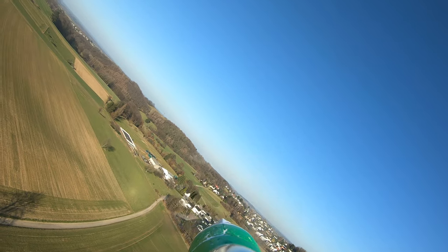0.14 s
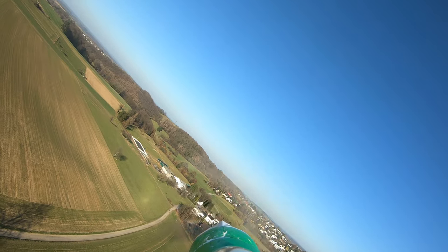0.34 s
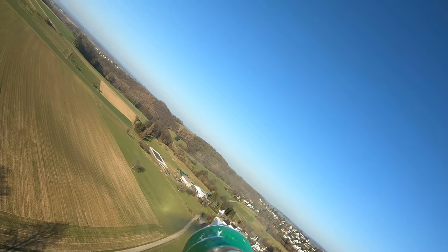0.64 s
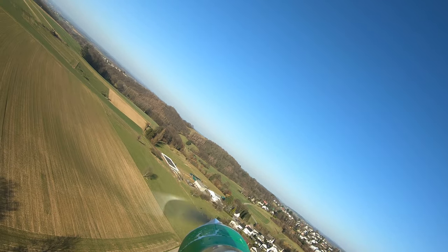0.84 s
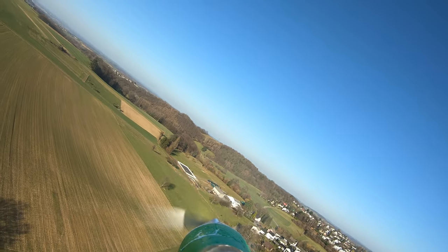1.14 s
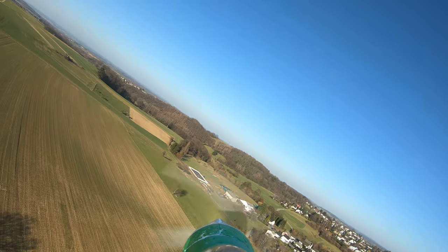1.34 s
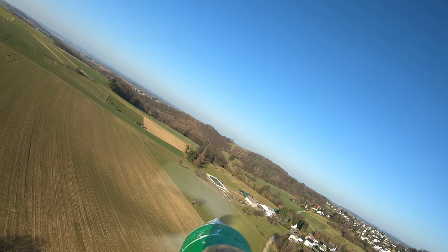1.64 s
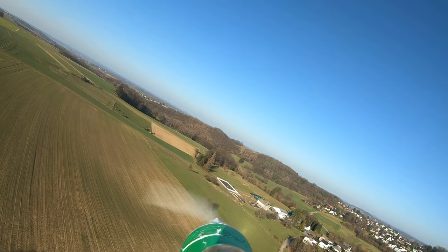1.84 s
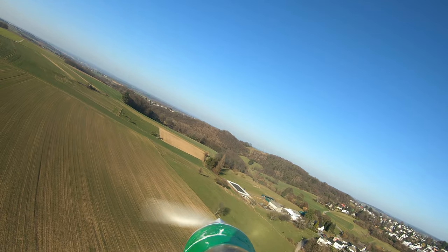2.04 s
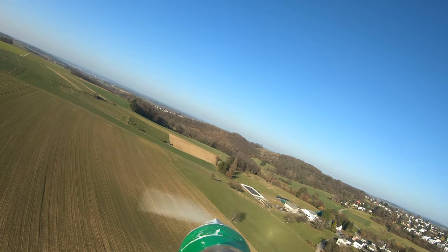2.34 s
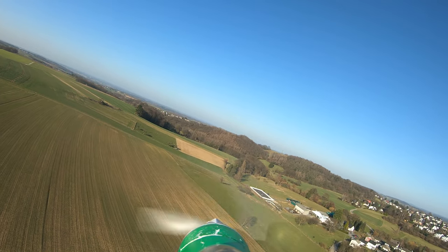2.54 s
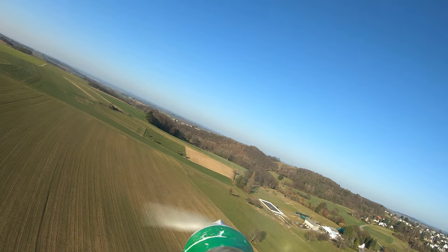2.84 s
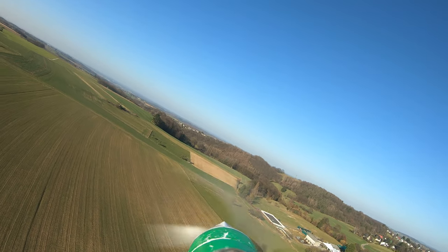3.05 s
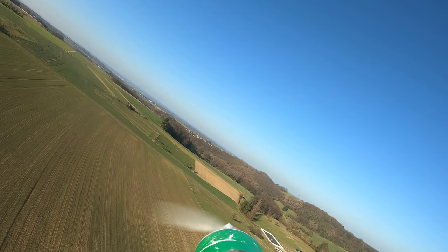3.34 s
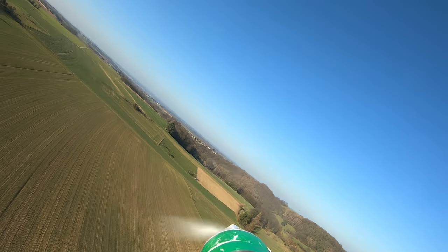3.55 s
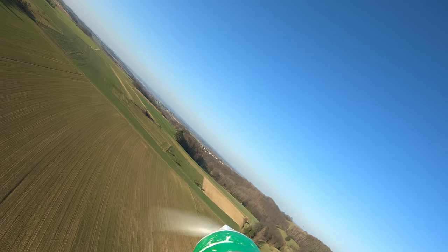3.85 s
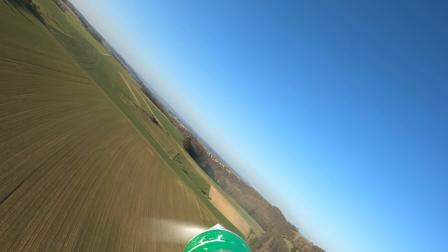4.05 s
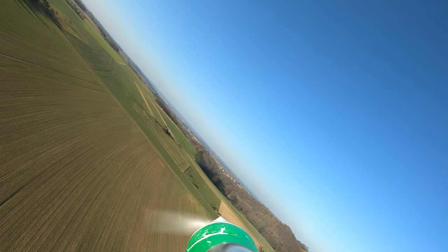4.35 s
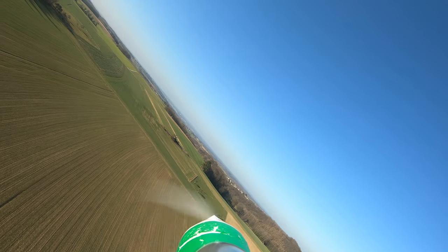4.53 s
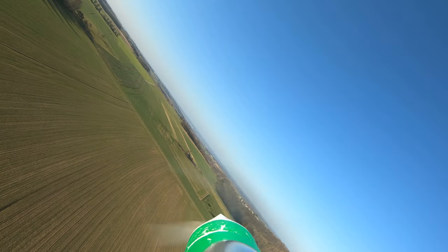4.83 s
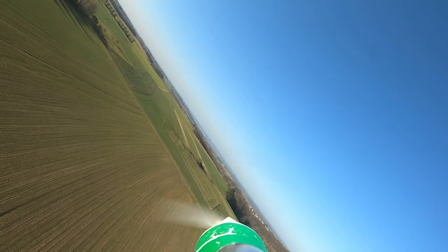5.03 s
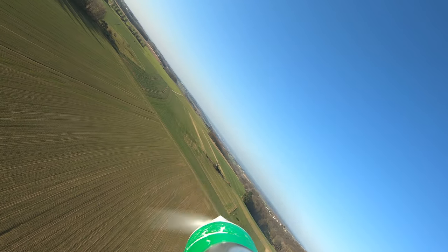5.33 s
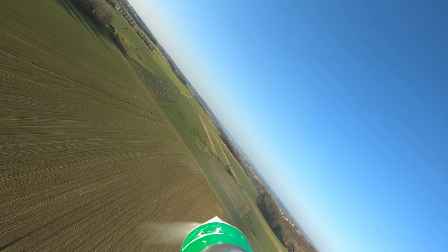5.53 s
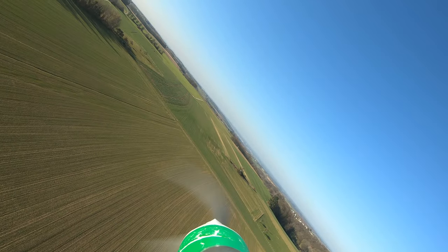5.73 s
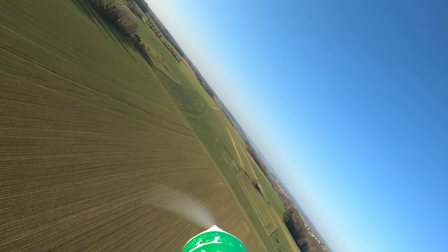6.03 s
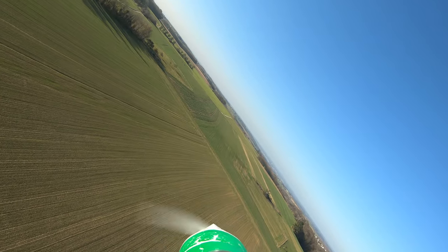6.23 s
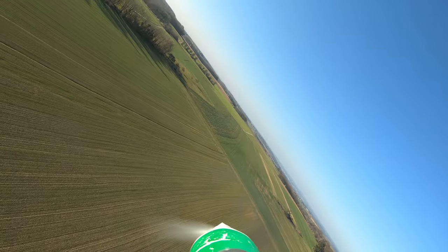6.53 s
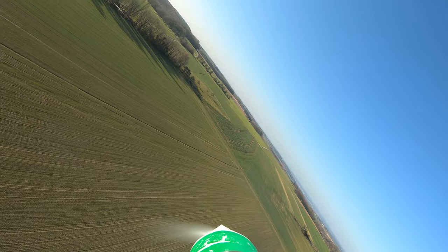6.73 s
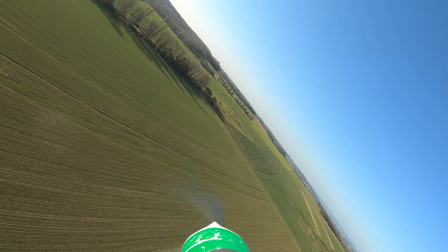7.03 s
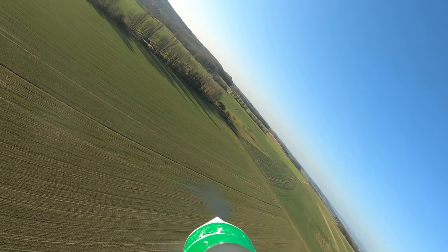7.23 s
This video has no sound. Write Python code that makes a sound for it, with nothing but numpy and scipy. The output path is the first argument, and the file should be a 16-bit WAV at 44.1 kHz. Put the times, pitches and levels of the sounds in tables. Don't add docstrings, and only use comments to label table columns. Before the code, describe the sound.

Aboard a small electric model airplane in open sky, a two-blade propeller hums low and buzzy just ahead of the microphone. Slipstream rumbles, flutters and hisses over it in uneven gusts. The drone holds nearly steady for about five seconds, then slides down by a few semitones as the throttle is reduced. Afterward it is rougher, with high motor whine and dry bearing rattle showing through.

```python
import sys
import numpy as np
from scipy import signal
from scipy.fft import rfft, irfft, next_fast_len
from scipy.io import wavfile
from scipy.ndimage import uniform_filter1d, minimum_filter1d

SR = 44100
rng = np.random.default_rng(int(sys.argv[2]) if len(sys.argv) > 2 else 0)


def output_pcm(signal):
    pcm = np.clip(np.atleast_2d(signal).T, -1, 1) * 32767
    wavfile.write(sys.argv[1], SR, np.round(pcm).astype(np.int16))


def volts_from_decibels(level):
    exponent = np.asarray(level, float) / 20
    return 10 ** exponent


N = 325458
TIME = np.arange(N) / SR
BALL_PASSES = 4.147
PORTS_OPPOSED = np.array([[1], [-1]])


def curves(table):
    start_s, *columns = np.transpose(table)
    return [np.interp(TIME, start_s, column) for column in columns]


def unit(x):
    return x / np.sqrt(np.mean(x ** 2))


def walk(rate_hz):
    hold = int(SR / rate_hz)
    steps = np.repeat(rng.standard_normal(N // hold + 1), hold)
    return unit(uniform_filter1d(uniform_filter1d(steps, hold), hold)[:N])


def at_hz(points, hz):
    point_hz, value = np.transpose(points)
    return np.interp(np.log(hz), np.log(point_hz), value)


def spectrum_hz(size):
    return np.maximum(np.arange(size // 2 + 1) * SR / size, 1)


def eddies(colour, flicker_db, rate_hz):
    size = next_fast_len(N)
    hz = spectrum_hz(size)
    low_hz, high_hz = colour[0][0], colour[-1][0]
    inside = (hz > low_hz) & (hz < high_hz)
    noise = rfft(rng.standard_normal(size)) * volts_from_decibels(at_hz(colour, hz)) * inside
    out = 0
    for octaves in np.arange(0, np.log2(high_hz / low_hz) + .5, .5):
        centre_hz = low_hz * 2 ** octaves
        band = np.cos(np.pi * np.clip(np.log2(hz / centre_hz), -.5, .5)) ** 2
        out = out + irfft(noise * band, size)[:N] * volts_from_decibels(flicker_db * walk(rate_hz))
    return unit(out)


def tone(phase, left_db, right_db, lead_rad):
    left = volts_from_decibels(left_db) * np.sin(phase)
    right = volts_from_decibels(right_db) * np.sin(phase + lead_rad)
    return np.sqrt(2) * np.array([left, right])


# start_s, length_s, level_db
WAKE_GUSTS = [(0.166, 0.1, 2.5), (0.353, 0.27, 1), (0.8, 0.088, 1.0), (1.016, 0.24, 1), (1.207, 0.82, 1),
              (1.663, .2, 1.5), (1.985, 0.3, 1), (2.41, 0.19, 3), (2.726, .2, -2.5), (3.303, 0.23, 1.5),
              (3.6, 0.26, 4.5), (3.89, 0.17, 5), (4.198, 0.16, 3.5), (4.35, .12, -3), (4.79, 0.069, -0.5),
              (4.97, 0.39, 4), (5.856, 0.3, 1), (6.588, 0.27, 2.5), (6.93, .5, -2.5), (7.1, .4, -7)]


def gusts():
    edge_s = .03

    def rise(start_s):
        return .5 + .5 * np.tanh(2 * (TIME - start_s) / edge_s)

    return sum(db * (rise(s) - rise(s + length)) for s, length, db in WAKE_GUSTS)


# pitch_hz, level_db per Hz
THUMP_COLOUR = [(15, -16), (28, -3.5), (45, -3.5), (70, 1), (110, -4), (160, -13), (300, -32)]


def thump(slip, eased, gust_db):
    level_db = -28.0 + 0.88 * slip + 3.9 * eased + 0.14 * gust_db
    shared = eddies(THUMP_COLOUR, .8, 6)
    opposed = .7 * PORTS_OPPOSED * eddies(THUMP_COLOUR, .8, 6)
    return (shared + opposed) * volts_from_decibels(level_db)


def shedding(colour, eased):
    slow = [(0.92 * hz, db) for hz, db in colour]
    return np.sqrt(1 - eased) * eddies(colour, .6, 14) + np.sqrt(eased) * eddies(slow, .6, 14)


# pitch_hz, level_db per Hz
LEFT_BUFFET = [(50, -20.5), (90, -6), (130, 0), (230, -1.5), (330, -4), (420, -10), (600, -30),
               (1000, -56.5)]
# pitch_hz, level_db per Hz
RIGHT_BUFFET = [(50, -30), (90, -4), (130, 0), (230, -2), (300, -4), (360, -8), (450, -17), (700, -38)]


def buffet(slip, eased, gust_db):
    left_db = -17.5 + 0.57 * slip + 0.67 * eased + 0.14 * gust_db
    right_db = -27.5 + 0.9 * slip + 6.9 * eased + 0.23 * gust_db
    left = shedding(LEFT_BUFFET, eased) * volts_from_decibels(left_db)
    right = shedding(RIGHT_BUFFET, eased) * volts_from_decibels(right_db)
    return np.array([left, right])


# pitch_hz, level_db per Hz
RUSH_COLOUR = [(250, -12), (380, -3), (500, 0), (750, -4), (1000, -10), (1500, -17), (2300, -28),
               (3300, -35), (4200, -42), (5200, -39), (5900, -49), (8000, -53), (10500, -68)]


def rush(eased, gust_db):
    level_db = -28.0 + 0.6 * eased + .2 * gust_db
    return PORTS_OPPOSED * eddies(RUSH_COLOUR, 1.2, 12) * volts_from_decibels(level_db + walk(30))


# pitch_hz, level_db per Hz
DULL_COLOUR = [(300, -8), (480, 2), (700, -6), (1100, -13), (1600, -16), (2500, -23.5), (3500, -28.5)]


def dull_roar(slip, eased, gust_db, flutter_db):
    level_db = -35.5 + 0.9 * slip - 0.2 * eased + 0.14 * gust_db
    return eddies(DULL_COLOUR, 0.48, 15) * volts_from_decibels(level_db + 0.84 * flutter_db)


# pitch_hz, level_db per Hz
HISS_COLOUR = [(1200, 0.5), (2000, -4), (2600, -4), (3600, -1.5), (4400, -8.5), (5300, -9.5), (7800, -15.5),
               (8400, -17), (9400, -16), (10500, -22), (12000, -31.5), (15200, -52)]


def hiss(slip, eased, gust_db, flutter_db):
    level_db = -50.5 + 0.33 * slip + 3.9 * eased + gust_db
    return eddies(HISS_COLOUR, 0.3, 14) * volts_from_decibels(level_db + 0.9 * flutter_db + 0.49 * walk(300))


# pitch_hz, left_minus_right_db
HOUSING_SHADE = [(500, -7), (2500, -7.5), (4500, 0), (5800, -8.5), (8000, -6), (8500, -3.5), (9500, -5),
                 (10500, -3.5), (12000, 0)]


def housing(x):
    size = next_fast_len(N)
    shade_db = at_hz(HOUSING_SHADE, spectrum_hz(size))
    split = np.array([[.5], [-.5]])
    return irfft(rfft(x, size) * volts_from_decibels(shade_db * split), size)[:, :N]


# centre_s, half_width_s, level_db
SLIPSTREAM_LULLS = [
    (5.97, 0.04, -8),
    (3.6, 0.018, -2),
    (3.5, 0.017, -5),
]


def wind(turn, eased, slip, gust_db):
    lull_db = sum(db * np.exp(-((TIME - s) / width) ** 2) for s, width, db in SLIPSTREAM_LULLS)
    lull = volts_from_decibels(lull_db)
    wake = volts_from_decibels(0.89 * np.cos(2 * turn) + 1.1 * np.cos(turn + 0.33))
    flutter_db = .6 * walk(12) + walk(45)
    out = thump(slip, eased, gust_db)
    out = out + buffet(slip, eased, gust_db) * lull
    out = out + rush(eased, gust_db) * wake ** 0.83 * lull ** 0.26
    out = out + dull_roar(slip, eased, gust_db, flutter_db) * wake ** 1.5
    return out + housing(hiss(slip, eased, gust_db, flutter_db) * wake)


# pitch_hz, width_hz, level_db
FRAME_RINGS = [(2550, 300, -8), (3000, 250, 0), (3500, 300, -1), (4050, 300, -6.5), (4700, 600, -6),
               (5350, 400, -7)]


def bearing_rattle(turn, level_db):
    passes = BALL_PASSES * turn / (2 * np.pi) + .024 * walk(250) + .04 * walk(12)
    ticks = np.abs(np.diff(np.floor(passes), prepend=0))
    ticks = ticks * (1 + .4 * np.cos(2 * turn))
    ticks = unit(ticks * volts_from_decibels(2.5 * rng.standard_normal(N)))
    strikes = ticks + .7 * rng.standard_normal(N)
    rattle = 0
    for hz, width_hz, db in FRAME_RINGS:
        b, a = signal.iirpeak(hz, hz / width_hz, SR)
        rattle = rattle + volts_from_decibels(db) * signal.lfilter(b, a, strikes)
    band = signal.butter(4, [2000, 5700], "bandpass", fs=SR, output="sos")
    rattle = unit(signal.sosfilt(band, rattle)) * volts_from_decibels(level_db + walk(12))
    return rattle * volts_from_decibels(np.array([[-2.0], [1.5]]))


SQUEAL = 5.0, 5.55, .06, -57.5, 5


def bearing_squeal(turn):
    start_s, end_s, edge_s, level_db, order = SQUEAL
    even = np.clip(np.minimum(TIME - start_s, end_s - TIME) / edge_s, 0, 1)
    phase = order * BALL_PASSES * turn + .9 * walk(30)
    return even * tone(phase, level_db - 2, level_db + 1.5, 0) * volts_from_decibels(2 * walk(15))


def chopping(turn, level_db):
    chopper = 2 * np.pi * 7954.5 * TIME
    steady = tone(chopper, level_db - 17.0, level_db, .1)
    beating = tone(chopper + 4 * turn, level_db - 23.0, level_db - 16.5, .1)
    return steady + beating


# multiple_of_shaft, left_db, right_db, right_lead_rad
WHINE_LINES = [(15, -9, -4, 1.5), (30, -3, 0, 1.8), (60, -22, -19, 2.5)]


def magnet_whine(turn, eased, whine_db, sing_db):
    out = 0
    for order, left_db, right_db, lead_rad in WHINE_LINES:
        loud_db = sing_db if order == 30 else -55.5 + .2 * (whine_db + 69.5)
        phase = order * turn + .5 * walk(25) + .25 * walk(90)
        line = tone(phase, loud_db + left_db, loud_db + right_db, lead_rad - 2.5 * eased)
        out = out + line * volts_from_decibels(1.3 * walk(30))
    return out


# start_s, level_db
FRAME_SINGING = [(5.1, -63), (5.25, -60), (5.58, -58), (5.63, -50), (5.95, -43.5), (6.332, -48.5),
                 (6.804, -40), (7.05, -50), (7.19, -57.5)]


def motor(turn, eased, slip, gust_db):
    whine_db = -68 + 4.5 * slip + 3.0 * eased
    sing_db = np.where(TIME > FRAME_SINGING[0][0], curves(FRAME_SINGING)[0] + 1.1, whine_db)
    chop_db = -74 + 3.2 * slip + 13 * eased + 0.21 * gust_db
    rattle_db = -53.5 + 1.01 * (chop_db + 65) + 0.1 * (sing_db + 49.5) * eased
    out = magnet_whine(turn, eased, whine_db, sing_db) + chopping(turn, chop_db)
    return out + bearing_rattle(turn, rattle_db) + bearing_squeal(turn)


def rough_line(order, turn, rough, left_db, right_db, lead_rad):
    phase = order * turn + rough * (.3 * walk(9) + .2 * walk(40))
    shake_db = rough * (1.2 * walk(10) + 1.2 * walk(40))
    left_only = rough * (.12 * walk(15) + .3 * walk(60)) + .3 / order ** 2 * walk(5)
    left_db = left_db - .7 + 1.3 * shake_db
    right_db = right_db - .3 + shake_db
    return tone(phase + left_only, left_db, right_db, lead_rad - left_only)


# multiple_of_shaft, left_db, right_db, right_lead_rad
BLADE_OVERTONES = [(3, -15, -13, 1.3), (4, -18, -18, 3.1), (5, -21.5, -24, 2.3), (6, -31, -29, 2.6),
                   (7, -31, -28, 2.6), (8, -35, -29.5, 2.4), (9, -36, -33, 2.8), (10, -34, -33, 2.3),
                   (12, -43, -38, 2.5), (13, -44, -39, 2.5)]


def blade_overtones(turn, edge_db):
    out = 0
    for order, left_db, right_db, lead_rad in BLADE_OVERTONES:
        phase = order * turn + .25 * walk(9) + .2 * walk(40)
        line = tone(phase, edge_db + left_db, edge_db + right_db, lead_rad)
        out = out + line * volts_from_decibels(2.2 * walk(5) + 1.2 * walk(14))
    return out


def propeller(turn, eased, slip, blade_db):
    rough = np.clip(.5 + (-13 - blade_db) / 8, .3, 1.7)
    brake_db = 12 * eased * (1 - eased)
    shaft_left_db = -15.0 - 3.4 * slip - 6.3 * eased + brake_db
    shaft_right_db = -23.5 + 7.3 * slip - 1.1 * eased + brake_db
    shaft_lead = 1.51 + 0.91 * slip - 0.73 * eased
    blade_right_db = blade_db - 7.5 + 5.6 * slip + 0.9 * eased
    blade_lead = -2.1 + 0.24 * slip - 1.7 * eased
    shaft = rough_line(1, turn, np.minimum(rough, .8), shaft_left_db, shaft_right_db, shaft_lead)
    blades = rough_line(2, turn, rough, blade_db, blade_right_db, blade_lead)
    edge_db = -18.5 + .4 * (blade_right_db + 19) + .45 * (shaft_right_db + 19) - 4.5 * eased
    return shaft * volts_from_decibels(-3.0 * eased) + blades + blade_overtones(turn, edge_db)


# start_s, turns_per_s
SHAFT_SPEED = [(0.0, 144.1), (0.9, 145.4), (1.2, 146.5), (2.1, 146.8), (3.0, 146.7), (3.44, 147.2),
               (3.8, 146.6), (4.18, 147.0), (4.43, 146.3), (4.7, 144.0), (5.04, 143.4), (5.54, 124.5),
               (5.7, 122.1), (5.95, 121.1), (6.33, 121.8), (6.8, 119.9), (7.2, 122.4), (7.38, 122.4)]
# start_s, blade_level_db, sideslip_0_to_1
FLIGHT_PATH = [(0.0, -11.5, 0.3), (0.25, -16, 0.96), (0.74, -12.5, 0.38), (1.15, -17, 0.85),
               (1.48, -15, 0.56), (2.3, -15.5, .9), (2.8, -12.5, 0), (3.25, -14.5, 0.18),
               (3.7, -22.5, 0.78), (4.0, -19.5, 1), (4.43, -14.5, 0.03), (4.75, -13.5, 0.37),
               (5.17, -24.5, 0.22), (5.45, -18, 0.22), (5.9, -28, 1), (6.5, -17.5, 0.74), (6.9, -16.5, 1),
               (7.13, -7, 0.12)]


def scene():
    speed, = curves(SHAFT_SPEED)
    turn = 2 * np.pi * np.cumsum(speed) / SR
    eased = np.clip((143 - speed) / 20, 0, 1)
    blade_db, slip = curves(FLIGHT_PATH)
    air = wind(turn, eased, slip, gusts())
    return air + motor(turn, eased, slip, gusts()) + propeller(turn, eased, slip, blade_db)


def roll_off(x):
    return signal.sosfilt(signal.butter(12, 15050, fs=SR, output="sos"), x)


def record(dry):
    reach = int(.004 * SR)
    peak = -minimum_filter1d(-abs(dry), reach)
    gain = np.minimum(1, (.6 / np.maximum(peak, 1e-6)) ** .7)
    gain = uniform_filter1d(minimum_filter1d(gain, reach), reach)
    gain = gain * np.clip((TIME[-1] - TIME) / .004, 0, 1)
    mix = dry * gain * volts_from_decibels(1.07)
    return roll_off(mix)


dry = scene()
out = record(dry)
output_pcm(out)
```